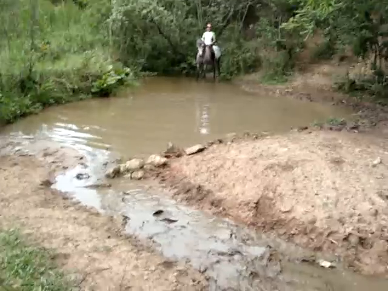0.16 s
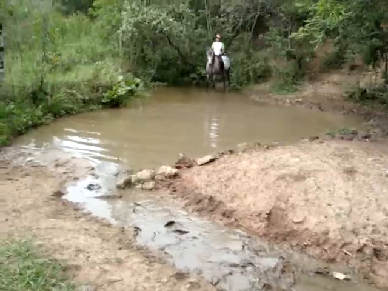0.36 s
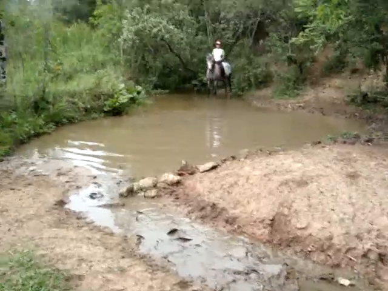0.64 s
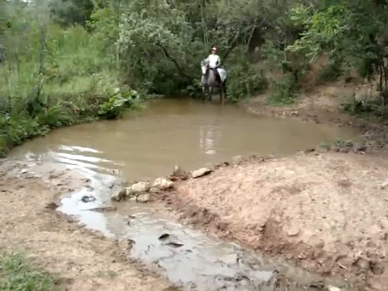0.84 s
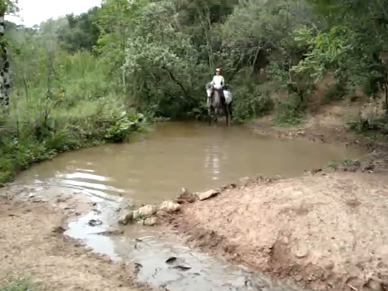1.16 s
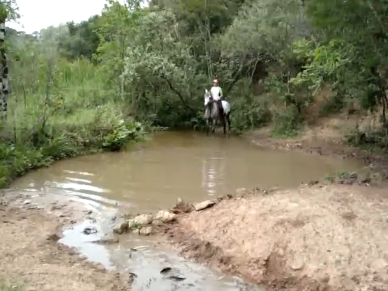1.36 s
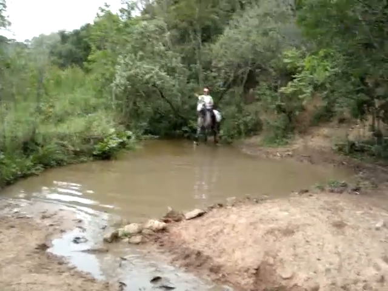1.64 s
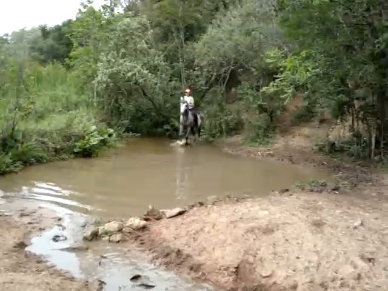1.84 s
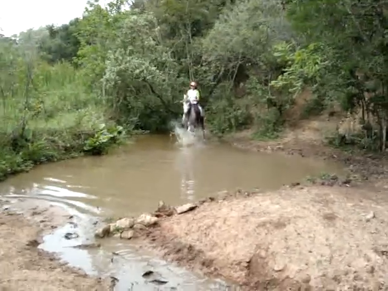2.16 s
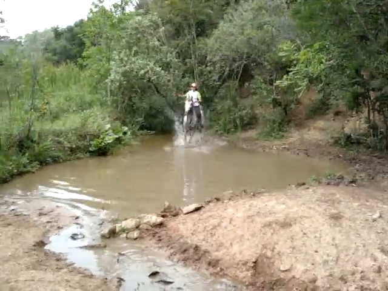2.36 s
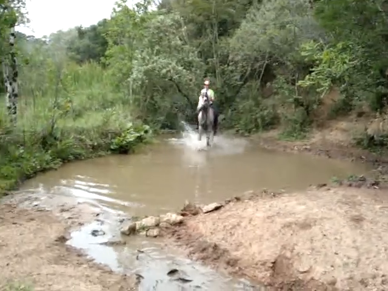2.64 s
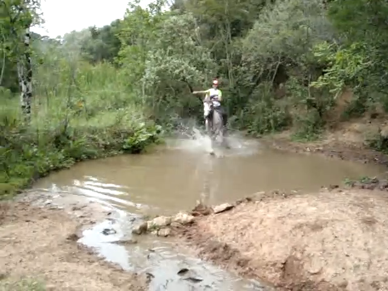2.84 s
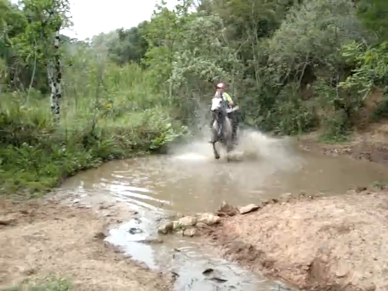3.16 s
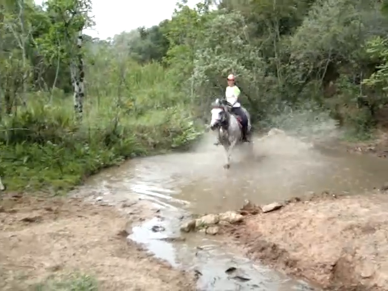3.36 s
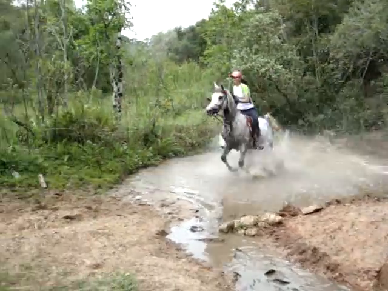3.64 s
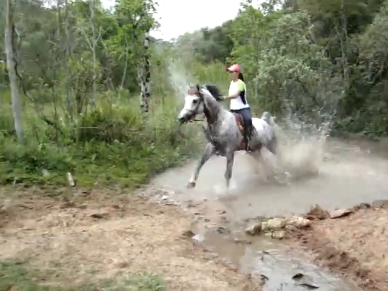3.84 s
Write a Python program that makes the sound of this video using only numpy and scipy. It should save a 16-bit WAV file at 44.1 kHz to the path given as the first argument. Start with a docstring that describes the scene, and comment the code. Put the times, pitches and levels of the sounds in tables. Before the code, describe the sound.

Hooves splash through shallow water outdoors. After a quiet opening with faint insects, a galloping horse approaches, throwing up louder and louder slaps, gulps and spray, while handling clicks and brief scrapes sound right at the microphone.

```python
"""Hoof splashes, distant at first, grow louder as a horse gallops through a shallow pond towards us.
Each hoof throws up bubbles and spray; some slap, thud or leave a gulping hole. Falling water builds
to a wash. The microphone is on a hand-held camera, whose case clicks and scrapes at very close range.
Further off, insects shrill in the bushes and a faint hum wavers."""
import sys
import numpy as np
from scipy import signal
from scipy.fft import rfft, irfft
from scipy.io import wavfile
from scipy.ndimage import uniform_filter1d

SR = 44100
rng = np.random.default_rng(int(sys.argv[2]) if len(sys.argv) > 2 else 0)


def log_audio(samples):
    """Write samples as a 16-bit WAV file to the path given in sys.argv[1]."""
    # one column per channel
    frames = np.atleast_2d(samples).T
    # limit to full scale, then quantise
    limited = np.clip(frames, -1, 1)
    pcm = np.round(limited * 32767).astype(np.int16)
    wavfile.write(sys.argv[1], SR, pcm)


N = 176400
T = np.arange(N) / SR
CLICK_RISE_S = 0.00032


def amp(db):
    """Decibels to gain."""
    return 10 ** (np.asarray(db) / 20)


def unit(x):
    """Scales to rms 1."""
    return x / np.sqrt(np.mean(x ** 2) + 1e-20)


def shaped(x, gain):
    """Filters by a gain that is a function of frequency."""
    return irfft(rfft(x) * gain(np.fft.rfftfreq(len(x), 1 / SR) + 1e-3), len(x))


def coloured(x, spectrum):
    """Gives a flat sound a spectrum (f/Hz, level/dB), at rms 1."""
    hz, db = np.transpose(spectrum)
    return unit(shaped(x, lambda f: amp(np.interp(np.log(f), np.log(hz), db))))


def noise():
    """White noise for the whole scene."""
    return rng.standard_normal(N)


def wander(hz):
    """Random drift below a rate, at rms 1."""
    return unit(shaped(noise(), lambda f: 1 / (1 + (f / hz) ** 4)))


def burst(start, rise, decay):
    """Envelope: a straight rise, then an exponential fall; times in seconds."""
    return np.clip((T - start) / rise, 0, 1) * np.exp(-np.maximum(T - start - rise, 0) / decay)


def impacts(per_s, spread_db):
    """Random clicks, most of them small."""
    hits = rng.random(N) < per_s / SR
    sizes = amp(spread_db * np.minimum(rng.exponential(1, N), 4.5))
    return hits * sizes * rng.choice([-1, 1], N)


def splashes():
    """Out in the pond, bubbles, drops and fizz swell with each hoof: a low churn and a high spray."""
    # hoof splashes: t/s, rise/s, decay/s, churn level/dB, spray level/dB
    hooves = [(1.513, 0.005, 0.04, -46.5, -53), (1.685, 0.029, 0.096, -42, -55),
              (1.845, 0.029, 0.045, -36.5, -37.5), (2.324, 0.012, 0.08, -28, -36.5),
              (2.529, 0.008, 0.22, -31, -31.5), (2.666, 0.018, 0.054, -33.5, -26.5),
              (2.802, 0.026, 0.016, -27, -25.5), (3.083, 0.042, 0.15, -26.5, -24),
              (3.208, 0.005, 0.039, -25, -22.5), (3.341, 0.005, .022, -28, -25),
              (3.499, 0.0038, 0.039, -20, -20.5), (3.619, 0.0022, 0.071, -21.5, -23.5),
              (3.635, 0.064, 0.092, -25, -25), (3.887, 0.0031, 0.011, -21, -21),
              (3.945, 0.06, .06, -25.5, -22)]
    # falling and stirred water: t/s, churn level/dB, spray level/dB
    wash = [(1.35, -57.5, -62.5), (1.8, -49.5, -51.5), (1.95, -41, -40.5), (2.1, -36.5, -35),
            (2.25, -36, -39), (2.5, -38, -35), (2.75, -33, -35.5), (3.05, -30.5, -31.5),
            (3.42, -29.5, -30.5), (3.6, -25.5, -23), (3.8, -29.5, -23.5), (4.0, -25, -28)]
    # spectrum of the water: f/Hz, level/dB
    spectrum = [(30, -37), (110, -31), (170, -14.5), (230, -6.5), (370, -8.5), (570, 0.5), (750, -8),
                (980, -0.5), (1200, -2.5), (1650, -5), (2200, -9.5), (3000, -5), (3700, -5), (5200, -11),
                (7500, -15.5), (10000, -16)]
    drops_db, fizz_db, crossover_hz = -2.0, 3.5, 2210
    grains = bubbles() + amp(drops_db) * unit(impacts(per_s=3500, spread_db=3.7))
    grains += amp(fizz_db) * noise()
    water = coloured(clumped(grains), spectrum)
    churn = shaped(water, lambda f: 1 / (1 + (f / crossover_hz) ** 6))
    spray = water - churn
    times, churn_db, spray_db = np.transpose(wash)
    power = amp([np.interp(T, times, churn_db), np.interp(T, times, spray_db)]) ** 2
    for start, rise, decay, low_db, high_db in hooves:
        power += (amp([[low_db], [high_db]]) * burst(start, rise, decay)) ** 2
    return (np.sqrt(power) * [unit(churn), unit(spray)]).sum(0)


def bubbles(per_s=2600, cycles_per_decay=6):
    """Swarms of bubbles ring in short rising tones; the small, high ones are the most frequent."""
    pitches_hz = np.geomspace(650, 9000, 36)
    shares = np.sqrt(pitches_hz) / np.sqrt(pitches_hz).sum()
    out = np.zeros(N)
    for hz, share in zip(pitches_hz, shares):
        age = np.arange(0, 5, hz / cycles_per_decay / SR)  # in decay times
        ring = np.exp(-age) * np.sin(2 * np.pi * cycles_per_decay * (age + 0.029 * age ** 2))
        births = impacts(per_s * share, spread_db=2)
        out += np.sqrt(hz) * unit(signal.oaconvolve(births, ring)[:N])
    return unit(out)


def clumped(x, depth_db=1.56):
    """Water lands in clumps: random patches of level over time and frequency."""
    frames = signal.stft(x, nperseg=256, noverlap=192)[2]
    patches = uniform_filter1d(rng.standard_normal(frames.shape), size=9, axis=0)
    patches = unit(uniform_filter1d(patches, size=8, axis=1))
    return signal.istft(frames * amp(depth_db * patches), nperseg=256, noverlap=192)[1][:N]


def slaps():
    """A hoof landing flat drives out trapped air: a rough, hollow note that sags as the leg sinks."""
    # slaps on the surface: t/s, f/Hz, level/dB, decay/s
    strikes = [(1.515, 960, -43, 0.024), (1.731, 940, -42, 0.032), (2.594, 1103, -23.5, 0.032),
               (3.116, 1073, -20.5, 0.022), (3.16, 1130, -22.5, 0.018), (3.214, 999, -17.5, 0.0085),
               (3.501, 1150, -19.5, 0.036), (3.6195, 1809, -14.5, 0.012), (3.639, 599.6, -25.5, 0.089),
               (3.899, 1100, -17, 0.008)]
    sag_per_s, rough_rad, width_share = 1.2, 1.17, 0.16
    out = np.zeros(N)
    for start, hz, db, decay in strikes:
        pitch = hz * np.exp(-sag_per_s * np.clip(T - start, 0, 1))
        phase = 2 * np.pi * np.cumsum(pitch) / SR + rough_rad * wander(hz * width_share)
        out += amp(db) * unit(np.sin(phase)) * burst(start, rise=0.0016, decay=decay)
    return out


def gulps():
    """Air pockets close behind the hooves; each rings briefly and unevenly, rising in pitch."""
    # air pockets: t/s, f/Hz, level/dB
    pockets = [(1.77, 457, -36.5), (2.535, 508, -30.5), (2.724, 564, -27), (3.127, 235, -24.5),
               (3.228, 310, -23), (3.245, 503, -23), (3.414, 189, -27.5), (3.482, 330, -24),
               (3.675, 224, -21.5), (3.779, 177, -22.5)]
    glide_per_s, low_cut_hz = 1.0, 130
    out, wobble = np.zeros(N), wander(84)
    for start, hz, db in pockets:
        age = np.clip(T - start, 0, 1)
        phase = 2 * np.pi * hz * (age + glide_per_s * age ** 2 / 2) + wobble
        out += amp(db) * burst(start, rise=0.0034, decay=0.02) * np.sin(phase)
    return shaped(out, lambda f: 1 / (1 + (low_cut_hz / f) ** 6))


def thuds(hz=91.5):
    """A hoof landing on the mud gives a low push of a cycle or two; the first push comes with a knock on the
    camera."""
    # hooves on the bed of the pond, and a knock on the camera at 2.674 s: t/s, level/dB
    landings = [(2.674, -43), (3.255, -35), (3.503, -37), (3.637, -43.5), (3.681, -34), (3.741, -36.5),
                (3.89, -43)]
    return sum(amp(db) * burst(start, rise=0.0039, decay=0.0093) * np.sin(2 * np.pi * hz * (T - start))
               for start, db in landings)


def handling():
    """Right at the microphone, a knock rings the camera's case, thumps and may trail off in a scrape."""
    # knocks on the case: t/s, click level/dB, thump level/dB, scrape level/dB
    knocks = [(.0618, -8, -40, -69.5), (1.9326, -13, -25, -21.5), (2.678, -5.5, -33, -21),
              (2.8025, -7, -61, -40), (3.03, -14.5, -59, -38), (3.2595, -5.5, -37, -31.5),
              (3.5032, -5, -23.5, -28.5), (3.8905, -22, -33, -24.5)]
    # resonances of the case: f/Hz, level/dB, time to fall 60 dB/s
    modes = [(1350, -6.5, 0.0047), (2360, -17, 0.0023), (3600, 2.5, 0.0047), (3940, -5, 0.0073),
             (4780, 6, 0.0013)]
    # spectrum of the scrape: f/Hz, level/dB
    scrape_spectrum = [(100, -33), (600, 3), (2000, -0.5), (3400, 5.5), (7000, 2), (10000, -5.5)]
    # spectrum of the thump in the microphone: f/Hz, level/dB
    thump_spectrum = [(40, -28.5), (190, -0.5), (600, -3.5), (1500, -12.5), (3000, -41)]
    scrape = coloured(noise(), scrape_spectrum)
    thump = coloured(noise(), thump_spectrum)
    t = T[:SR // 20]
    ring = sum(amp(db - 60 * t / t60) * np.sin(2 * np.pi * hz * t) for hz, db, t60 in modes)
    ring *= np.minimum(t / CLICK_RISE_S, 1)
    out = np.zeros(N)
    for start, click_db, thump_db, scrape_db in knocks:
        out += amp(click_db) * np.interp(T - start, t, ring, left=0, right=0)
        out += amp(thump_db) * thump * burst(start, rise=0.001, decay=0.0047)
        crunch = amp(-0.5) * burst(start, rise=0.0024, decay=0.002)
        out += amp(scrape_db) * scrape * (crunch + burst(start, rise=0.0012, decay=0.039))
    return out


def finger_taps(centre_hz=1580):
    """A fingertip near the microphone makes a dry knock, too soft to set the case ringing."""
    # taps on the camera: t/s, level/dB
    taps = [(.369, -43), (1.085, -36.5), (1.0883, -35.5)]
    knock = unit(shaped(noise(), lambda f: 1 / (1 + (np.log(f / centre_hz) / 0.97) ** 8)))
    return knock * sum(amp(db) * burst(start, CLICK_RISE_S, decay=0.0027) for start, db in taps)


def still_air(level_db=-54):
    """The open air around the pond is a soft, steady hush."""
    # spectrum of the air: f/Hz, level/dB
    spectrum = [(30, -20.5), (100, -6), (250, 1), (450, 3.5), (1000, -3.5), (1800, -9), (3500, -12.5),
                (5500, -14.5), (8000, -12.5), (10000, -18.5)]
    return amp(level_db) * coloured(noise(), spectrum)


def insects(flutter_db=2, whistle_hz=4520):
    """Off in the bushes, a chorus shrills in fluttering bands and one insect gives a thin whistle."""
    # bands of the chorus: f/Hz, width/Hz, level/dB
    chorus = [(4340, 340, -57.5), (6315, 280, -60), (6610, 150, -63.5), (8100, 600, -67)]
    # swell of the whistle: t/s, level/dB
    swell = [(.8, -66.5), (1.02, -54.5), (1.25, -67)]
    out = np.zeros(N)
    for hz, width, db in chorus:
        song = shaped(noise(), lambda f: 1 / (1 + ((f - hz) / width * 1.38) ** 2))
        out += amp(db) * unit(song * amp(flutter_db * wander(60)))
    whistle = unit(np.sin(2 * np.pi * whistle_hz * T + wander(24)))
    return out + amp(np.interp(T, *np.transpose(swell))) * whistle


def hum(waver_db=2):
    """Two faint low tones in the background waver in level and pitch."""
    # partials of the hum: f/Hz, level/dB
    partials = [(199.2, -69.5), (300.5, -62)]
    return sum(amp(db + waver_db * wander(7.1)) * unit(np.sin(2 * np.pi * hz * T + 0.82 * wander(13)))
               for hz, db in partials)


def scene():
    """Horse, handling noise and countryside reach one microphone, the same in both channels."""
    horse = splashes() + slaps() + gulps() + thuds()
    mono = horse + handling() + finger_taps() + still_air() + insects() + hum()
    return np.array([mono, mono])


def record(dry):
    """The camera's sound opens just after the start and lacks the top treble."""
    open_s, fade_s, cutoff_hz = 0.0557, 0.003, 10030
    opened = dry * np.clip((T - open_s) / fade_s + 1, 0, 1)
    low_pass = signal.firwin(401, cutoff_hz, window=("kaiser", 8), fs=SR)
    return signal.oaconvolve(opened, low_pass[None], "same")


dry = scene()
out = record(dry)
log_audio(out)
```